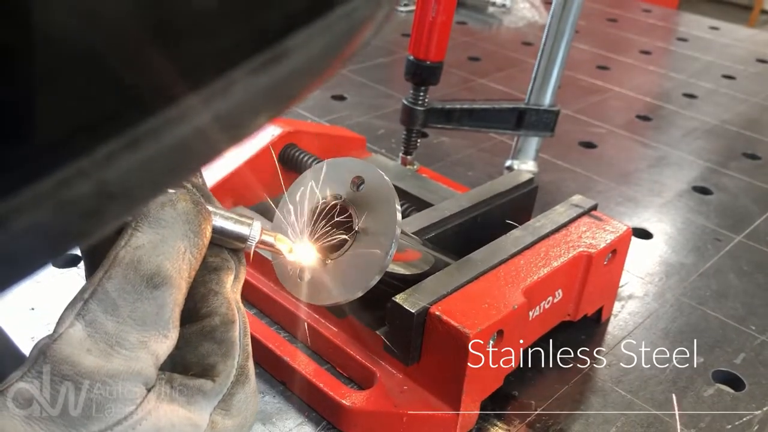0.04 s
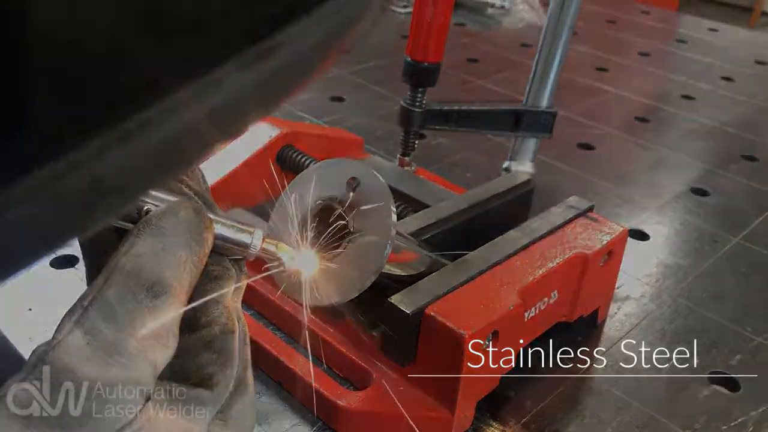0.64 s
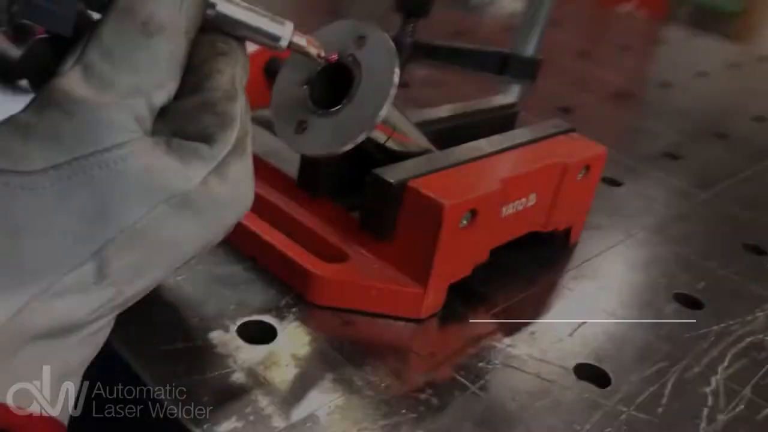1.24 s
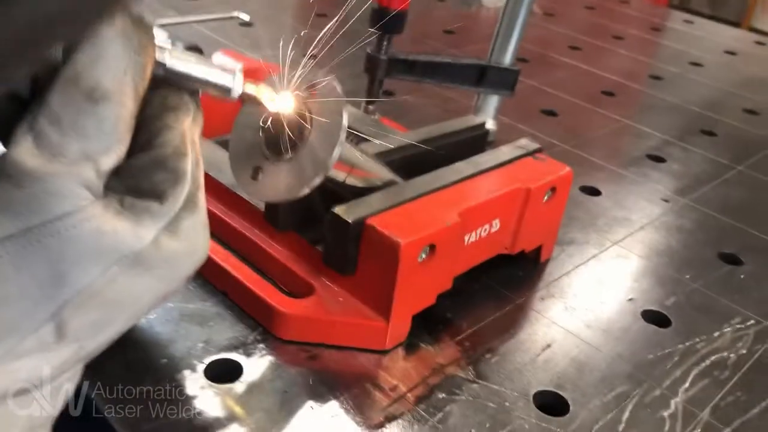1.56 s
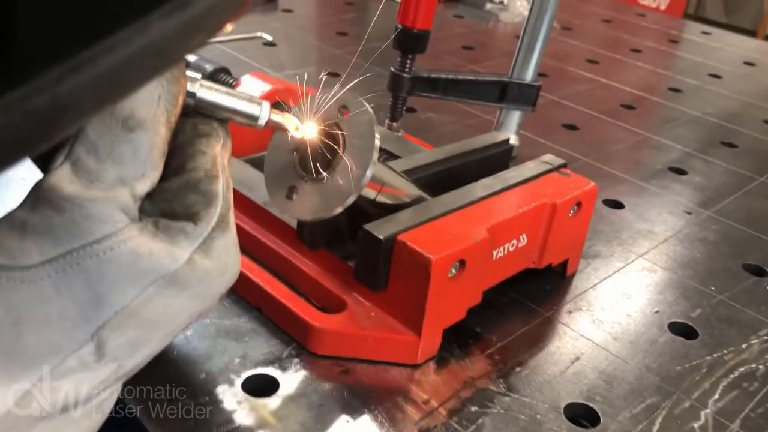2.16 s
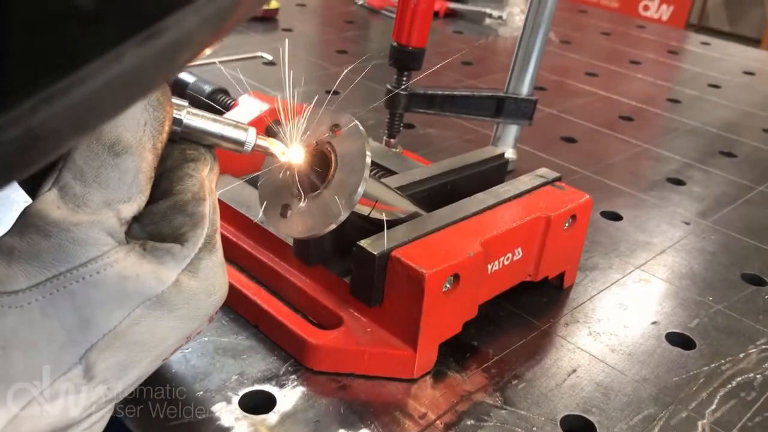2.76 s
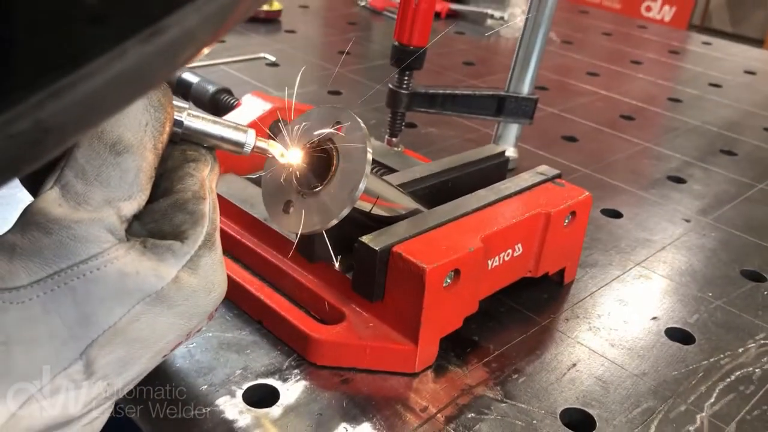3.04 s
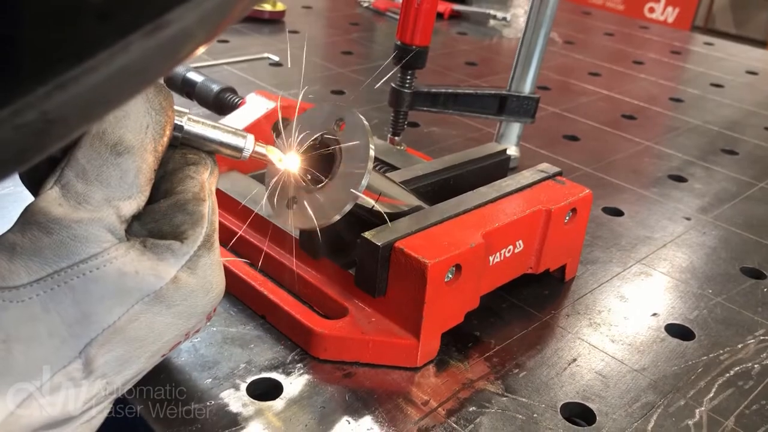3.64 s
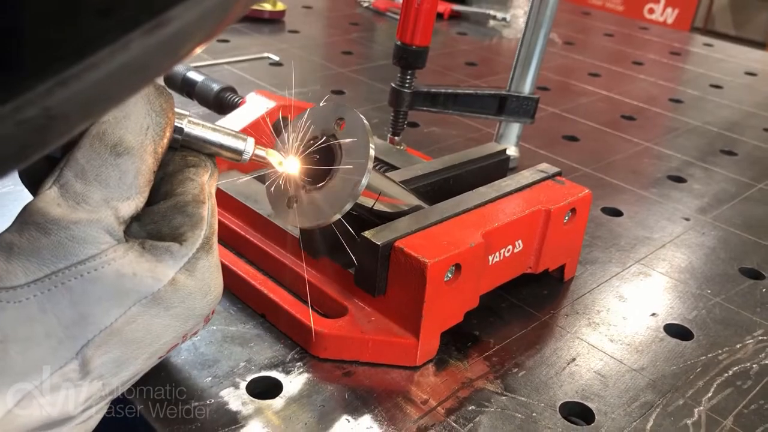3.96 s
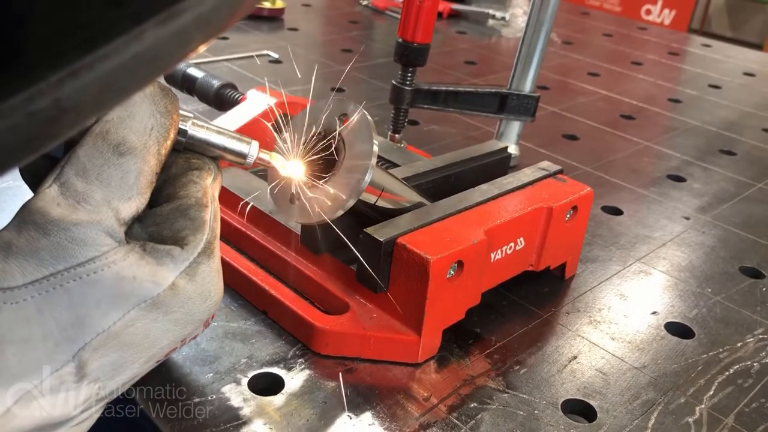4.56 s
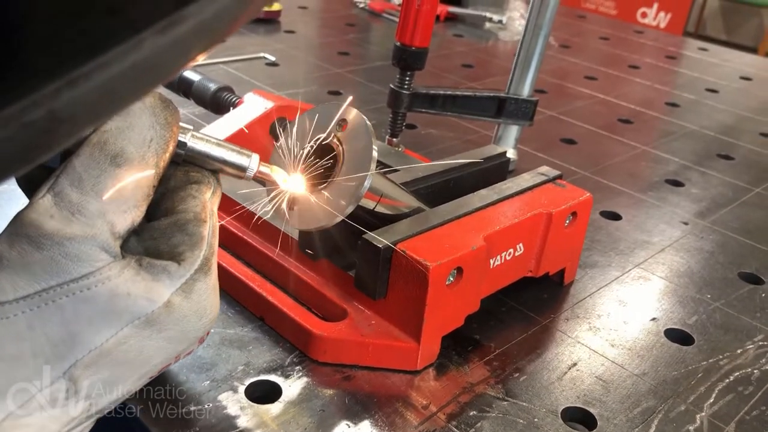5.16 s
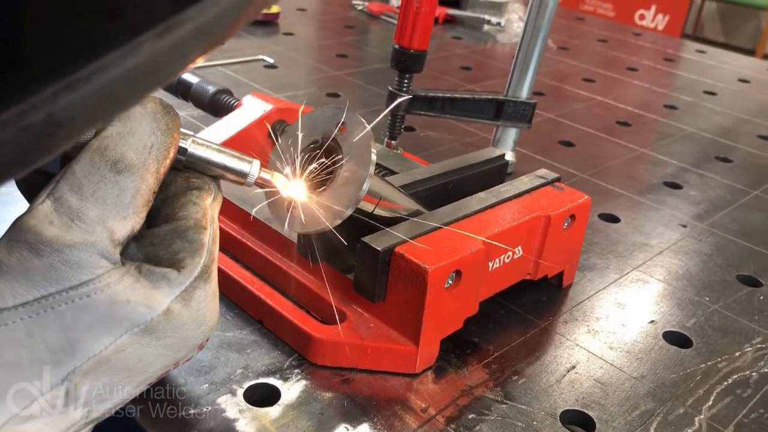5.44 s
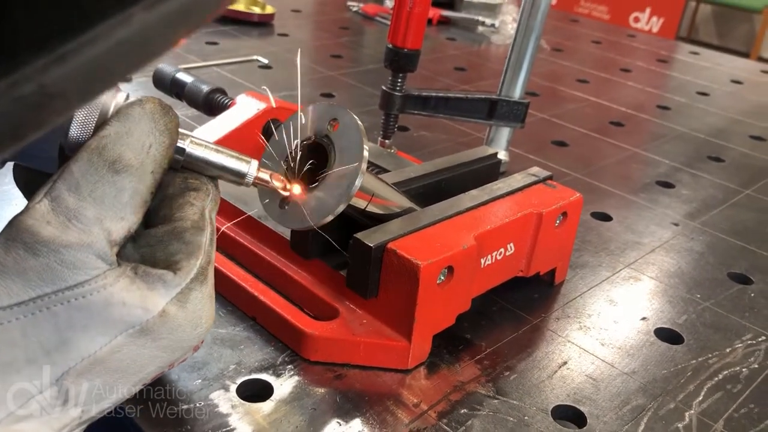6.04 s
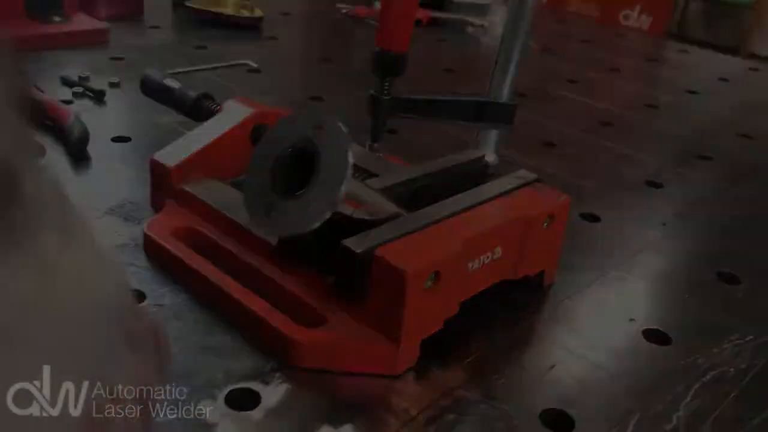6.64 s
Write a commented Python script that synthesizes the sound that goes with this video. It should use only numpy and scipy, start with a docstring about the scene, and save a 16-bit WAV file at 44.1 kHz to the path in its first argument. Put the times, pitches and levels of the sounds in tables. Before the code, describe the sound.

Close to the microphone, a laser welding torch sizzles on steel with a high, fluttering hiss, cuts off, and lets shielding gas flow for a moment. It restarts with a quick crackle and hisses steadily for several seconds, now and then turning glassy for an instant. A light glove scuff and a brief hollow hoot mark the end, then half-whistling gas fades into the workshop's quiet fan rumble and machine hum.

```python
"""A hand-held laser welds a steel flange (a metal rim) in a vice, heard from close by.
A short run of bright, sputtering hiss throbs with the beam, then the shielding gas flows on briefly.
Pops start a long run, whose hiss the flange colours as the torch travels round it.
It ends with a soft scuff, a low hoot and more gas. All along, the sound turns glassy for an instant
now and then, while fans rumble and the machine hums and whines in the workshop."""
import sys
import numpy as np
from scipy import signal
from scipy.fft import rfft, irfft, next_fast_len
from scipy.io import wavfile
from scipy.ndimage import map_coordinates

SR = 44100
rng = np.random.default_rng(int(sys.argv[2]) if len(sys.argv) > 2 else 0)


def unload_audio(sound):
    """Save the sound as a 16-bit wav file, at the path given as the first command line argument."""
    columns = np.transpose(np.atleast_2d(sound))
    # keep every value between -1 and 1, then stretch to whole-number steps
    steps = np.round(np.clip(columns, -1, 1) * 32767)
    wavfile.write(sys.argv[1], SR, steps.astype(np.int16))


N = 299439

BEAM_HZ, TOP_HZ = 80.45, 15780  # beam pulses a second; upper edge of the treble
LONG_ON_S, LONG_OFF_S = 1.418, 6.043  # the beam switches on and off for the long weld


def long_weld(turn_deg_per_s=57.7, near_side_deg=155, heating_db_per_s=.33):
    """The hiss swells as the metal melts, throbs hard with a low note under it, then settles."""
    t = clock()
    angle_deg = turn_deg_per_s * (t - LONG_ON_S)  # how far the torch has gone round
    facing = np.cos(np.radians(angle_deg - near_side_deg))  # 1 on the near side, -1 on the far side
    age = np.maximum(t - LONG_ON_S, 0)
    flare_db = 3 * np.exp(-age / 0.27)
    cold_db = -15 * np.exp(-age / 0.041)  # cold metal holds the bright hiss back at first
    surge_db = bell(t, centre=2.1, width=0.5, db=1.6)  # the throb deepens once
    level_db = -17.5 + heating_db_per_s * age + flare_db
    hiss_db = level_db + cold_db - 0.4 * surge_db
    sizzle_db = level_db - 15 + 0.8 * facing
    # tone of the vapour jetting from the melt: f/Hz, level/dB
    vapour = [(60, -37), (200, -30), (700, -26.5), (1750, -25.5), (2400, -21), (3500, -13.5), (4700, -15),
              (6200, -8.5), (8000, -4), (9500, -2.5), (11300, 0.5), (13500, -1.5), (14600, 1.5),
              (15700, -4.5)]
    # resonances (+) and shadows (-) of flange and vice: f/Hz, width/Hz, gain/dB
    resonances = [(1028, 50, 11), (1470, 90, 3.5), (2250, 150, 5.5), (4080, 150, 7.5), (4370, 130, -3),
                  (5130, 150, 3), (5560, 220, -4.5), (6550, 200, 2.5), (7050, 200, -2), (7700, 250, 2),
                  (9900, 140, 4), (10380, 80, 3), (10570, 90, -4), (13250, 200, -3)]
    puffs = boiling(sputter_db=0.9, flutter_db=0.57, spits_per_s=500, spit_db=6)
    melt = circling(coloured(puffs, vapour, resonances), angle_deg, facing)
    hiss = throbbing(melt, hiss_db, sizzle_db, depth_db=1.5 + surge_db, crest_s=0, sizzle_share=0.59)
    low_note = amp(-69 + 6.3 * surge_db) * np.sqrt(2) * np.sin(2 * np.pi * BEAM_HZ * t)
    return (hiss + low_note) * gate(LONG_ON_S, LONG_OFF_S, 0.028, 0.0056) ** 2


def short_weld():
    """Boiling metal hisses steadily from the start and stops at once with the beam."""
    # tone of the vapour jetting from the melt: f/Hz, level/dB
    vapour = [(60, -49), (300, -35.5), (1500, -33), (2100, -23), (3500, -25), (5000, -19), (6000, -11),
              (7400, -13.5), (8200, -3.5), (9700, -7), (10900, -2.5), (13200, -7), (14200, 2.5), (15700, 0)]
    # resonances (+) and shadows (-) of flange and vice: f/Hz, width/Hz, gain/dB
    resonances = [(1030, 70, 7), (1710, 85, -18), (2430, 120, -4), (4100, 160, 4), (4720, 130, -4),
                  (5400, 120, -7), (6520, 170, -10), (7650, 260, -10), (8850, 180, 3), (10850, 220, 3),
                  (11350, 170, -8), (12600, 250, 3), (13580, 260, -10)]
    puffs = boiling(sputter_db=1.0, flutter_db=0.24, spits_per_s=460, spit_db=7.5)
    melt = coloured(puffs, vapour, resonances)
    hiss = throbbing(melt, hiss_db=-18, sizzle_db=-33, depth_db=1.8, crest_s=0.0066, sizzle_share=0.78)
    return hiss * gate(on_s=-1, off_s=.666, rise_s=.01, fall_s=0.0078)


def boiling(sputter_db, flutter_db, spits_per_s, spit_db):
    """Vapour leaves the melted metal in uneven puffs; flying droplets add tiny snaps."""
    spits = (rng.random(N) < spits_per_s / SR) * rng.choice([-1, 1], N) * amp(spit_db)
    puffs = amp(sputter_db * wobble(900) + flutter_db * wobble(130) + 0.66 * wobble(20))
    return puffs * (rng.standard_normal(N) + spits)


def throbbing(melt, hiss_db, sizzle_db, depth_db, crest_s, sizzle_share, split_hz=6326):
    """The bright hiss throbs with the beam; the lower sizzle follows by a share of the depth."""
    phase = 2 * np.pi * BEAM_HZ * (clock() - crest_s)
    throb_db = depth_db * (np.cos(phase) - np.cos(2 * phase) / 4)  # a broad crest and a short lull
    low = filtered(melt, lambda hz: 1 / (1 + (hz / split_hz) ** 20))
    hiss = unit(amp(throb_db) * (melt - low))
    sizzle = unit(amp(sizzle_share * throb_db) * low)
    return amp(hiss_db) * hiss + amp(sizzle_db) * sizzle


def circling(melt, angle_deg, facing, slide=0.026):
    """As the torch goes round, the flange lifts some pitches and shadows others."""
    # the flange's lifts (+) and shadows (-): f/Hz, width/Hz, gain/dB, torch angle/deg, spread/deg
    lobes = [(1010, 100, 3.5, 50, 57), (2070, 240, 4, 25, 74), (3750, 420, 2.5, 250, 130),
             (6000, 790, 7, 118, 130), (5980, 500, -6.9, 222, 145), (8320, 395, -11, 33, 144),
             (8590, 760, 7.5, 47, 123), (8970, 240, -8, 252, 135), (10360, 360, -5, -20, 200),
             (11250, 1100, 6, 244, 78), (12030, 190, -7, 175, 84), (12700, 740, 3, 50, 150),
             (13400, 380, 8.5, 288, 180), (14550, 220, -5, 65, 53), (15020, 240, -12, 107, 67),
             (15520, 710, 9, 237, 136)]
    hz, t, slices = signal.stft(melt, SR, nperseg=1024)
    angle = np.interp(t, clock(), angle_deg)
    pitch_ratio = 1 + slide * np.interp(t, clock(), facing)  # all lobes sit higher on the near side
    gain = amp(sum(bell(hz[:, None] / pitch_ratio, centre, width, bell(angle, at, spread, db))
                   for centre, width, db, at, spread in lobes))
    power = np.mean(np.abs(slices) ** 2, axis=1, keepdims=True)
    gain /= np.sqrt(np.sum(power * gain ** 2, axis=0) / power.sum())  # keeps the loudness steady
    return signal.istft(slices * gain, SR, nperseg=1024)[1][:N]


def starting_pops(first_s=1.3975, count=8, t60=0.024):
    """The first beam pulses burst through cold metal, one pop each, growing into the steady boil."""
    # tone of a pop: f/Hz, level/dB
    pop_tone = [(200, -16), (1500, -27), (2300, 1), (3200, -8), (4050, 6), (5000, -13), (9000, -1),
                (12000, 6), (15700, -4)]
    t = clock()
    times = first_s + np.arange(count) / BEAM_HZ
    sizes = swell(times, full_s=1.448, hold_s=0, rise=470, fall=120)
    bursts = sum(size * (t >= s) * amp(-60 * np.abs(t - s) / t60) for s, size in zip(times, sizes))
    return amp(-14.5) * bursts * noise(pop_tone)


def shielding_gas():
    """Gas hisses on after each weld, and half whistles as the nozzle passes an edge."""
    # each flow: start/s, shut/s, closing time/s, jet/dB, edge tone/dB, whistle peak/s, whistle/dB
    flows = [(0.658, 0.972, .004, -32.5, -42.5, 0.875, -33), (6.036, 6.568, 0.16, -33.5, -40.5, 6.292, -31)]
    # tones of the jet and of gas crossing the edge: f/Hz, level/dB
    jet_tone = [(300, -11), (1600, -21), (2000, -10.5), (2600, -21), (4500, -12), (5500, -5.5), (7000, -5),
                (8500, -5), (10200, -20), (13500, -15), (15700, -34)]
    edge_tone = [(2500, -48), (3400, -18), (3800, -3.5), (4080, 2), (4350, -10), (4800, -16), (6000, -48)]
    # peaks and dips of the jet against the flange after each weld: f/Hz, width/Hz, gain/dB
    first_peaks = [(1040, 60, 9), (2000, 150, 5), (5750, 350, 8), (6950, 200, 9), (7580, 230, -9),
                   (8350, 450, 9), (12950, 250, -9)]
    second_peaks = [(5500, 120, 4), (6000, 350, -5), (7050, 230, 10), (7700, 200, -4), (8250, 240, 8),
                    (13400, 220, 6)]
    t, gas = clock(), np.zeros(N)
    for flow, peaks in zip(flows, [first_peaks, second_peaks]):
        start_s, shut_s, closing_s, jet_db, edge_db, whistle_s, whistle_db = flow
        fade = swell(t, start_s, hold_s=0, rise=0, fall=25.5)  # the torch draws away
        whistle = amp(whistle_db) * swell(t, whistle_s, hold_s=0, rise=430, fall=157)
        jet = amp(jet_db) * fade * noise(jet_tone, peaks)
        edge = np.hypot(amp(edge_db) * fade, whistle) * noise(edge_tone)
        gas += (jet + edge) * gate(start_s, shut_s, .014, closing_s)
    return gas


def hoot(full_s=5.985, pitch_hz=354, scoop_hz=34, scoop_s=0.016):
    """A short hollow note scoops up to its pitch as the long weld ends."""
    t = clock()
    hz = pitch_hz - scoop_hz * (1 - np.tanh((t - full_s) / scoop_s + .5)) / 2
    note = np.sqrt(2) * np.sin(2 * np.pi * np.cumsum(hz) / SR)
    return amp(-35) * note * swell(t, full_s, hold_s=0.018, rise=700, fall=1000)


def scuffs():
    """Glove and torch brush the steel as the torch is set down and lifted."""
    # each touch: t/s, length/s, level/dB
    touches = [(1.423, 0.0062, -37.5), (5.947, 0.155, -43.5)]
    # dull tone of the rubbing: f/Hz, level/dB
    rub_tone = [(100, -27), (280, -2.5), (480, -1.5), (600, -14), (730, -6), (830, -12), (1010, -1),
                (1200, -15), (2500, -28)]
    strokes = sum(amp(db) * swell(clock(), s, length, rise=900, fall=850) for s, length, db in touches)
    return strokes * noise(rub_tone)


def glassy(x, stands_out_db=15, count=13, spacing_hz=450):
    """For an instant the noise drops out and only its strongest pitches ring on."""
    # each hollow moment: t/s, half length/s, noise gain/dB
    dips = [(0.051, 0.024, -52), (0.369, 0.016, -43), (0.518, 0.0062, -10), (1.009, .007, -12),
            (1.102, 0.0068, -7), (1.205, .017, -12), (2.1, 0.01, -14.5), (2.168, 0.0058, -15),
            (2.887, 0.013, -13.5), (2.931, 0.0078, -11), (3.144, 0.0078, -14.5), (3.262, 0.011, -10.5),
            (3.489, 0.013, -10), (3.538, 0.011, -14.5), (4.21, 0.011, -15), (4.694, 0.013, -10),
            (4.813, 0.011, -13), (5.348, 0.011, -14), (5.396, 0.0088, -14), (5.465, 0.0058, -16),
            (5.578, 0.01, -14), (5.881, .008, -14), (6.009, 0.016, -47), (6.141, 0.0075, -19)]
    out, t = x.copy(), clock()
    for s, half, db in dips:
        near = np.abs(t - s) < 2 * half + .01
        spectrum = rfft(x[near])
        size = np.abs(spectrum)
        peaks = signal.find_peaks(size, distance=max(1, spacing_hz * near.sum() / SR))[0]
        strongest = peaks[np.argsort(size[peaks])[-count:]]
        pitches = spectrum * (size > amp(stands_out_db) * size.mean())
        pitches[strongest] = spectrum[strongest]
        ring = unit(irfft(pitches, near.sum())) * np.std(x[near])
        kept = amp(db * np.exp(-np.abs((t[near] - s) / half) ** 3))
        out[near] = kept * x[near] + np.sqrt(np.abs(1 - kept ** 2)) * amp(-1.5) * ring
    return out


def room_echo(x, echo_db=-18, t60=0.19):
    """The workshop adds a faint echo that dies by 60 dB in t60 seconds."""
    t = np.arange(SR // 2) / SR
    tail = rng.standard_normal(len(t)) * amp(-60 * t / t60)
    return x + amp(echo_db) * signal.fftconvolve(x, tail / np.linalg.norm(tail))[:N]


def workshop():
    """Fans rumble, the machine hums along with them and its power supply whines unsteadily."""
    # loudness of the fans: t/s, level/dB
    fan_levels = [(0, -53), (.6, -53), (1, -47), (1.4, -45.5), (1.7, -46), (3.5, -49.5), (5.8, -49),
                  (6.15, -47), (6.79, -44.5)]
    # tone of the fans: f/Hz, level/dB
    fan_tone = [(25, -29), (60, -9.5), (110, -1.5), (190, 2.5), (330, -1.5), (550, -8), (850, -9.5),
                (1500, -18), (2300, -23), (3300, -29.5), (5200, -31.5), (10000, -30), (13000, -37),
                (15000, -46)]
    # fan resonances: f/Hz, width/Hz, gain/dB
    fan_peaks = [(3600, 160, 8), (4150, 300, 9)]
    # notes of the machine's hum and the power supply's whine: f/Hz, level/dB
    hum_notes = [(100, -57), (166, -59), (198, -59), (400, -63), (801, -67)]
    whine_notes = [(7975, -70), (8902, -68.5), (9706, -79), (10634, -70), (11561, -62.5), (12446, -78),
                   (14217, -86)]
    level_db = np.interp(clock(), *np.transpose(fan_levels))
    fans = amp(level_db + 0.49 * wobble(12)) * noise(fan_tone, fan_peaks)
    hum = amp(0.31 * (level_db - level_db.mean())) * tones(hum_notes, drift_rad=0.42, waver_db=1.5)
    whine = tones(whine_notes, drift_rad=1.2, waver_db=3)
    return fans + hum + whine


def tones(notes, drift_rad, waver_db):
    """Held notes, each wandering a little in phase and strength."""
    total = np.zeros(N)
    for hz, db in notes:
        gain = amp(db + waver_db * wobble(5))
        phase = 2 * np.pi * (hz * clock() + rng.random()) + drift_rad * wobble(14)
        total += gain * np.sqrt(2) * np.sin(phase)
    return total


def noise(tone, peaks=()):
    """Fresh noise with the given tone."""
    return coloured(rng.standard_normal(N), tone, peaks)


def coloured(x, tone, peaks):
    """Gives x a broad tone with narrow peaks and dips, then scales it to strength 1."""
    def response(hz):
        tone_hz, tone_db = np.transpose(tone)
        broad_db = np.interp(np.log(hz + 1), np.log(tone_hz + 1), tone_db)
        return amp(broad_db + sum(bell(hz, *peak) for peak in peaks)) * treble_cut(hz)
    return unit(filtered(x, response))


def filtered(x, response):
    """Scales each frequency in x by response(hz)."""
    size = next_fast_len(N + SR // 2)
    return irfft(rfft(x, size) * response(np.fft.rfftfreq(size, 1 / SR)), size)[:N]


def treble_cut(hz):
    """A gain that is flat, then falls steeply around TOP_HZ."""
    return np.sin(np.pi / 2 * np.clip((TOP_HZ + 100 - hz) / 200, 0, 1)) ** 2


def swell(t, full_s, hold_s, rise, fall):
    """A gain that climbs to 1, holds, then dies; rise and fall are in dB a second."""
    return amp(-rise * np.maximum(full_s - t, 0) - fall * np.maximum(t - full_s - hold_s, 0))


def gate(on_s, off_s, rise_s, fall_s):
    """A gain that starts to open at on_s and is shut by off_s."""
    return np.clip((clock() - on_s) / rise_s, 0, 1) * np.clip((off_s - clock()) / fall_s, 0, 1)


def bell(x, centre, width, db):
    """A rounded peak or dip, in dB."""
    return db * np.exp(-((x - centre) / width) ** 2)


def wobble(rate):
    """A smooth curve through `rate` random values a second."""
    return map_coordinates(rng.standard_normal(int(N * rate / SR) + 4), [clock() * rate])


def amp(db):
    """Decibels to gain."""
    return 10 ** (np.asarray(db) / 20)


def unit(x):
    """Scales x to an average strength (rms) of 1."""
    return x / np.sqrt(np.mean(x ** 2) + 1e-20)


def clock():
    """The time of each sample, in seconds."""
    return np.arange(N) / SR


def scene():
    """Welds, gas and workshop, alike in both channels."""
    welds = room_echo(short_weld() + long_weld())
    mono = glassy(welds + shielding_gas() + starting_pops() + scuffs() + workshop()) + hoot()
    return np.array([mono, mono])


def record(dry, ceiling=.62):
    """Rounds off the highest peaks and cuts the very top of the treble."""
    rounded = dry / (1 + np.abs(dry / ceiling) ** 6) ** (1 / 6)
    return np.array([filtered(channel, treble_cut) for channel in rounded])


dry = scene()
out = record(dry)
unload_audio(out)
```